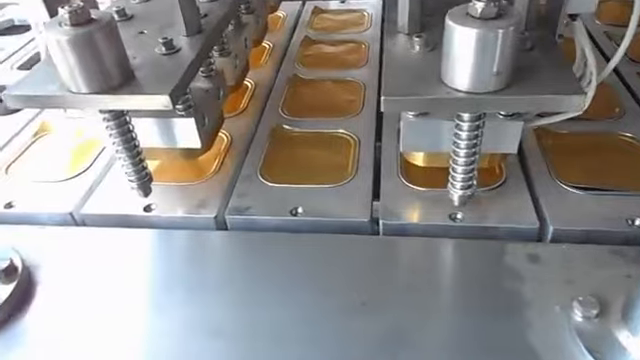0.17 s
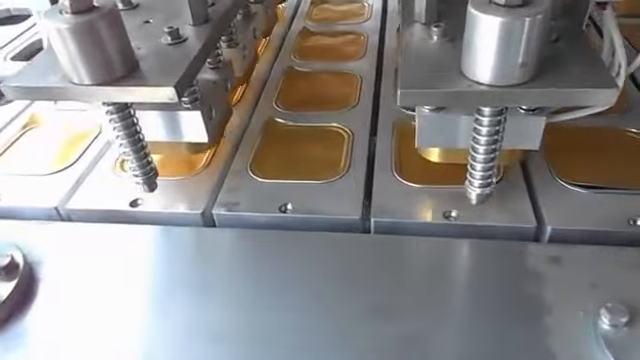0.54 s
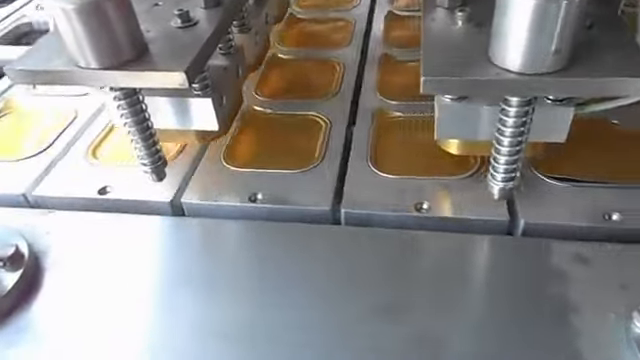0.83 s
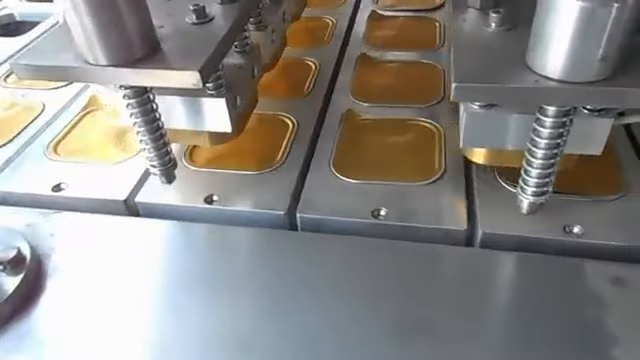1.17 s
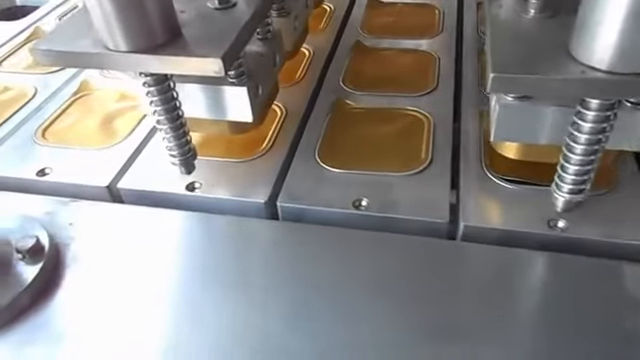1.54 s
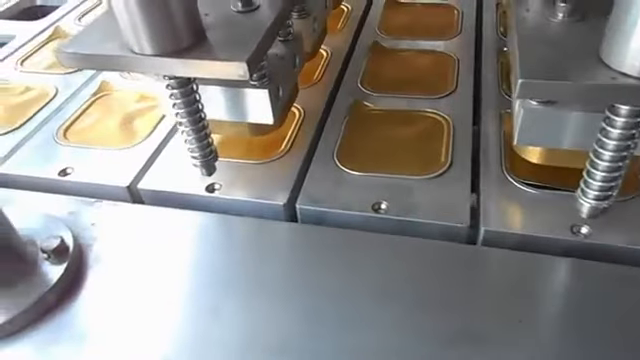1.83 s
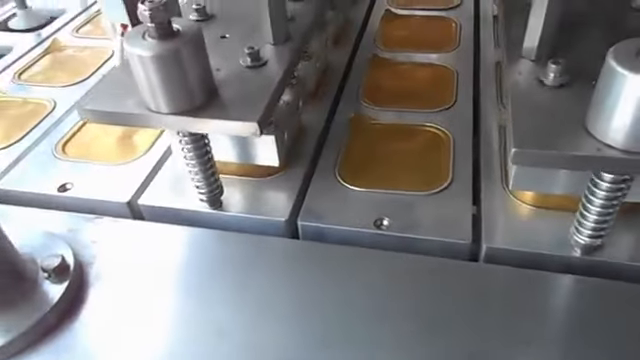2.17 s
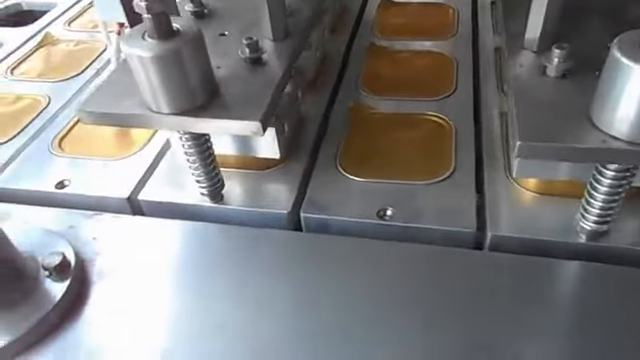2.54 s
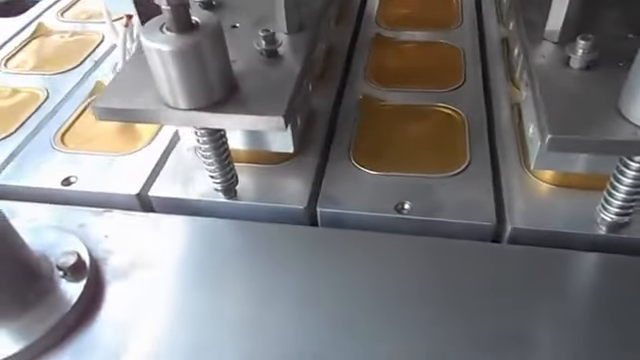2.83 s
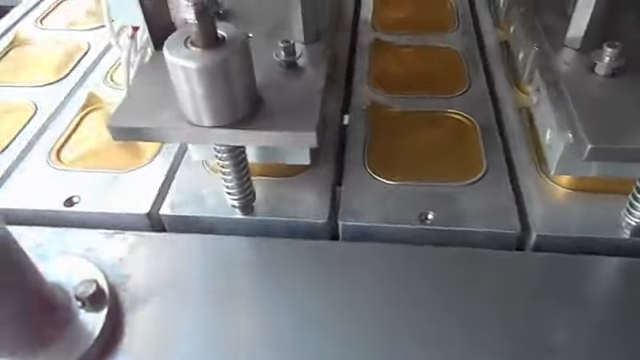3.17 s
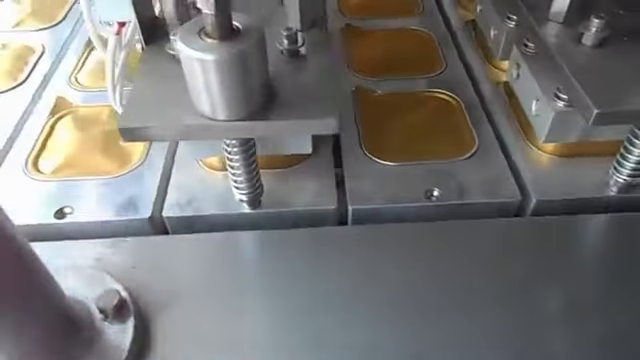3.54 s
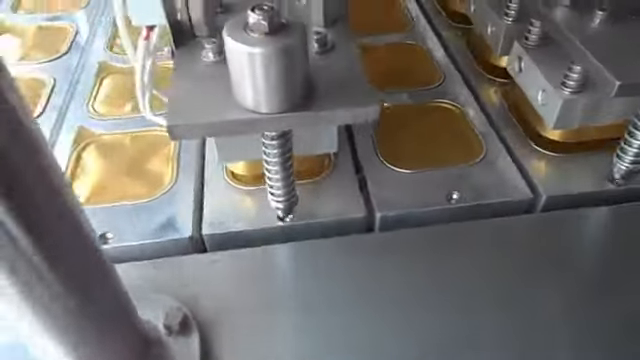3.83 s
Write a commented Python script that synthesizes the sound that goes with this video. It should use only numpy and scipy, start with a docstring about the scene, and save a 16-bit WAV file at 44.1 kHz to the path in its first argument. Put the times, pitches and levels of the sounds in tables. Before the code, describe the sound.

A pneumatic sealing machine works close by, over a low motor hum and rumble. Its conveyor scrapes along with a swell of air and clacks against a steel stop at 1.1 seconds. Around 1.8 seconds a valve snaps, air blasts out loudly and the sealing heads clunk down. From 2 to 4 seconds a bright hiss continues, with thin whistles, small knocks and a short spit of air at 3.5.

```python
"""A factory hall, close to a pneumatic lid-sealing machine. Over a motor hum, the tray conveyor
scrapes one step along with a swell of air and clacks against its steel stop. A valve snaps, air
blasts from the exhaust and the sealing heads clunk down. Air then hisses on steadily, whistling
at the seals, over small knocks of the frame. All of it is on the left channel, through a limiter."""
import sys
import numpy as np
from scipy import signal
from scipy.fft import rfft, irfft, next_fast_len
from scipy.io import wavfile
from scipy.ndimage import uniform_filter1d, minimum_filter1d, map_coordinates

SR = 44100
rng = np.random.default_rng(int(sys.argv[2]) if len(sys.argv) > 2 else 0)


def log_audio(samples):
    """Write samples as a 16-bit WAV file to the path given in sys.argv[1]."""
    # one column per channel
    frames = np.atleast_2d(samples).T
    # limit to full scale, then quantise
    limited = np.clip(frames, -1, 1)
    pcm = np.round(limited * 32767).astype(np.int16)
    wavfile.write(sys.argv[1], SR, pcm)


N = 176400
TIME = np.arange(N) / SR


def amp(db):
    """Decibels to gain."""
    return 10 ** (np.asarray(db) / 20)


def unit(x):
    """Scale to rms 1."""
    return x / np.sqrt(np.mean(x ** 2) + 1e-20)


def along(points, hz):
    """Read a curve of (f/Hz, value) points on a log frequency axis."""
    f, value = np.transpose(points)
    return np.interp(np.log(hz + 1), np.log(f + 1), value)


def fader(rows):
    """Gain per sample from (t/s, level/dB) rows."""
    return amp(np.interp(TIME, *np.transpose(rows)))


def wobble(rate):
    """A smooth random curve, rate knots a second."""
    return map_coordinates(rng.standard_normal(2000), [TIME * rate], mode="mirror")


def burst(start, attack, t60, hold=0):
    """Envelope that rises, holds, then falls 60 dB in t60 seconds."""
    t = TIME - start
    return np.clip(t / attack, 0, 1) * amp(-60 * np.maximum(t - attack - hold, 0) / t60)


def filtered(x, response):
    """EQ x with a gain given as a function of frequency."""
    size = next_fast_len(N + SR // 2)
    return irfft(rfft(x, size) * response(np.fft.rfftfreq(size, 1 / SR)), size)[:N]


def rush(tone, peaks=(), ripple_db=0):
    """Noise of rms 1 shaped by an EQ, narrow resonances and the fine ripple of nearby steel walls."""
    knots = rng.standard_normal(1000)
    def colour(f):
        resonance = sum(amp(db) ** 2 * 2 / (1 + (2 * (f - hz) / width) ** 2) for hz, width, db in peaks)
        ripple = np.interp(f, np.linspace(0, SR / 2, len(knots)), knots)
        return amp(along(tone, f) + ripple_db * ripple) * np.sqrt(1 + resonance)
    return unit(filtered(rng.standard_normal(N), colour))


def reflections(x, depth_db, spacing_hz=45, drift_s=.3):
    """Steel reflections ripple the spectrum, shifting as the microphone moves; returns rms 1."""
    hz, t, spectrum = signal.stft(x, SR, nperseg=4096)
    grid = np.meshgrid(hz / spacing_hz, t / drift_s, indexing="ij")
    ripple = map_coordinates(rng.standard_normal((600, 20)), grid, mode="mirror")
    return unit(signal.istft(spectrum * amp(depth_db * ripple), SR, nperseg=4096)[1][:N])


# Reverb decay of the hall: f/Hz, t60/s
HALL_DECAY = [(200, 1), (2000, 0.11), (10000, 0.14)]
def hall(x):
    """The factory hall's tail: the lows linger, the highs die quickly."""
    hz, t, spectrum = signal.stft(rng.standard_normal(SR // 2), SR, nperseg=256)
    decay = amp(-60 * t / along(HALL_DECAY, hz)[:, None])
    tail = signal.istft(spectrum * decay, SR, nperseg=256)[1]
    return signal.fftconvolve(x, tail / np.linalg.norm(tail))[:N]


# Background and handling rumble: t/s, level/dB
RUMBLE_FADER = [(0, -47.5), (1.5, -46), (3.0, -49.5), (3.8, -43.5)]
# Rumble EQ, all low end: f/Hz, level/dB
RUMBLE_EQ = [(20, -6.5), (80, -5), (130, -3), (170, -8), (210, -8.5), (270, -9), (330, -19), (700, -35),
             (1500, -69)]
def low_rumble():
    """Low background rumble, with microphone handling rumble swelling near the end."""
    return fader(RUMBLE_FADER) * rush(RUMBLE_EQ)


def hum_line(hz):
    """One motor partial of rms about 1 that flutters in level and phase."""
    flutter = amp(2.0 * wobble(20))
    return np.sqrt(2) * flutter * np.sin(2 * np.pi * hz * TIME + .5 * wobble(14))


# Motor partials: f/Hz, level while feeding/dB, level while pressing/dB
MOTOR_PARTIALS = [(222, -47, -59.5), (271.2, -42.5, -57), (457, -52, -65), (590, -43.5, -69),
                  (774, -52, -67), (859, -48.5, -66)]
# Low drone, dipping early and creeping back: t/s, level/dB
DRONE_FADER = [(.35, -41), (.6, -57), (1.25, -50.5), (1.6, -46.5), (3.7, -48)]
def motor(run_up_s=0.53, feed_end_s=1.57, run_down_s=0.72):
    """The hum swells with the conveyor's load, over a low drone."""
    load = np.clip(TIME / run_up_s, 0, 1) * np.clip(1 - (TIME - feed_end_s) / run_down_s, 0, 1)
    hum = sum(amp(pressing + (feeding - pressing) * load) * hum_line(hz)
              for hz, feeding, pressing in MOTOR_PARTIALS)
    return hum + fader(DRONE_FADER) * hum_line(hz=172.5)


# One conveyor step: t/s, level/dB
SCRAPE_FADER = [(0, -40.5), (.25, -33), (.85, -32), (1.05, -32.5), (1.3, -33.5), (1.5, -34.5), (1.9, -32),
                (2.1, -43), (2.35, -48.5), (3.0, -50.5), (3.45, -47), (3.62, -47), (3.8, -54), (4, -46.5)]
# Scrape EQ, full in the low mids: f/Hz, level/dB
SCRAPE_EQ = [(70, -36), (140, -7), (270, -9), (400, -9.5), (700, -7.5), (1100, -11), (2100, -19),
             (3100, -22.5), (5000, -24), (8000, -66)]
def conveyor():
    """The tray plates slide along with a grainy scrape."""
    grain = amp(-1.5 + 0.2 * wobble(45))
    return fader(SCRAPE_FADER) * grain * reflections(rush(SCRAPE_EQ), depth_db=2.2)


# Swell of air from the feed cylinder: t/s, level/dB
VENT_FADER = [(0, -45), (.3, -34), (.5, -32.5), (.6, -30), (.9, -27), (1.05, -30), (1.2, -36.5),
              (1.35, -41), (1.48, -45), (1.62, -46), (1.66, -42), (1.75, -43), (1.9, -75)]
# Vent EQ, broad and airy: f/Hz, level/dB
VENT_EQ = [(600, -10.5), (1100, -3), (2100, -4), (3300, -7.5), (4400, -4.5), (5300, -7.5), (6050, -4),
           (7100, -5.5), (8500, -0.5), (9500, -5), (10300, -7), (11000, -18.5), (12000, -25), (12700, -64)]
# Whistles of the part-open vent: f/Hz, width/Hz, level over the rush/dB
VENT_WHISTLES = [(5900, 220, 5.5), (6350, 150, 5), (8550, 490, 3)]
def feed_cylinder(fully_open_s=0.88):
    """The cylinder vents: a whistle crossfades to a plain rush as the vent opens."""
    opening = np.clip(TIME / fully_open_s, 0, 1)
    vent = np.sqrt(1 - opening) * rush(VENT_EQ, VENT_WHISTLES) + np.sqrt(opening) * rush(VENT_EQ)
    flutter = amp(0.72 * wobble(69.5))
    return fader(VENT_FADER) * flutter * reflections(vent, depth_db=3.0)


def clack(start, tone, modes, attack, t60, ring_db):
    """Steel hits steel: a dense crash with a few ringing modes."""
    ring = sum(amp(db) * burst(start, attack, decay) * np.sin(2 * np.pi * hz * TIME + .82 * wobble(150))
               for hz, db, decay in modes)
    crash = burst(start, attack, t60) * rush(tone, ripple_db=1.0)
    return crash + amp(ring_db) * ring


# Hard crash of the stop: f/Hz, level/dB
STOP_EQ = [(300, -44), (760, 1), (1800, -11.5), (2510, 0), (3460, -9), (5500, -6.5), (10100, -3.5),
           (11100, -26), (15500, -48)]
# Ring of the stop: f/Hz, level/dB, t60/s
STOP_RING = [(756, -9, 0.24), (2090, -9, 0.097), (2511, 6.5, 0.053), (4000, -9, 0.12), (5480, -5, 0.11),
             (6000, -14, 0.071)]
def end_stop():
    """The conveyor runs into its steel stop with a short, loud clack."""
    return amp(-7) * clack(1.1035, STOP_EQ, STOP_RING, attack=.0045, t60=0.044, ring_db=-10.5)


# Bright snap of the valve: f/Hz, level/dB
VALVE_EQ = [(500, -35), (1040, -3), (2000, -2.5), (3090, -3), (4700, -2), (8540, -0.5), (12500, -38),
            (15000, -68)]
# Ring of the valve: f/Hz, level/dB, t60/s
VALVE_RING = [(1087, -2.5, 0.076), (1110, -15, 0.063), (3190, -8, 0.089)]
def valve():
    """The steel valve snaps just ahead of the air blast."""
    return amp(-18.5) * clack(1.7515, VALVE_EQ, VALVE_RING, attack=.0008, t60=0.17, ring_db=3)


def ping(start, hz, db, t60):
    """One struck mode with a sharp attack and a slightly unsteady phase."""
    return amp(db) * burst(start, .0008, t60) * np.sin(2 * np.pi * hz * TIME + .5 * wobble(22.8))


# Knock cues: t/s, frame level/dB, thud level/dB, rattle level/dB, t60/s
KNOCK_CUES = [(0.939, -38, -52, -24.5, 0.26), (1.708, -56, -66, -36.5, 0.088),
              (1.797, -30.5, -59, -27, 0.15), (1.83, -27.5, -34.5, -20.5, 0.29),
              (1.912, -29, -45, -17, 0.11), (1.919, -20, -33.5, -24, 0.16), (1.975, -38, -38, -42, 0.21),
              (2.025, -51, -44, -46, 0.33), (2.143, -48, -45, -36, 0.11), (2.209, -34.5, -39.5, -39, 0.2),
              (2.392, -48, -56, -30.5, 0.15), (2.433, -41.5, -44, -29, 0.33),
              (2.704, -40.5, -39.5, -51, 0.22), (3.508, -33, -39.5, -41, 0.29),
              (3.557, -36.5, -52, -31, 0.59)]
# Mid layer, the frame's clunk: f/Hz, level/dB
FRAME_EQ = [(100, -19), (300, 1), (640, 4.5), (900, 8.5), (1300, -22.5), (1800, -7.5), (3000, 4),
            (6000, -58)]
# Body resonances of the frame: f/Hz, width/Hz, level/dB
FRAME_RESONANCES = [(547, 60, 2), (970, 57, 1), (1110, 66, 13), (1655, 44, 19)]
# Low layer, the machine bed's thud: f/Hz, level/dB
THUD_EQ = [(25, -4), (65, -30), (100, 3.5), (135, 1), (220, -11), (400, -7), (900, -63)]
# Top layer, the rattle of loose parts: f/Hz, level/dB
RATTLE_EQ = [(700, -3), (1700, 4.5), (2400, 1.5), (5000, 2), (10000, 1), (11000, -27), (13000, -54)]
def head_knocks(attack=0.0057, thud_stretch=1.75):
    """Each knock rings the frame in its own way, thuds through the bed and rattles loose parts."""
    bed, out = rush(THUD_EQ), np.zeros(N)
    for start, frame_db, thud_db, rattle_db, t60 in KNOCK_CUES:
        frame = amp(frame_db) * rush(FRAME_EQ, FRAME_RESONANCES, ripple_db=3.5)
        rattle = amp(rattle_db) * rush(RATTLE_EQ, ripple_db=3.5)
        out += burst(start, attack, t60) * (frame + rattle)
        out += burst(start, attack, t60 * thud_stretch) * amp(thud_db) * bed
    return out


# Whistle cues at the seals: t/s, length/s, f/Hz, level/dB
LEAK_CUES = [(2.15, .62, 4790, -39.5), (2.66, .13, 4850, -37), (2.05, .8, 5320, -40.5),
             (2.1, .7, 4110, -44), (3.42, .17, 4880, -36), (3.55, .45, 4470, -41.5)]
def seal_leaks(width_hz=55, waver_hz=18, fade_s=.06):
    """Thin, breathy whistles come and go at the seals, wavering in pitch."""
    out = np.zeros(N)
    for start, length, hz, db in LEAK_CUES:
        swell = np.clip(np.minimum(TIME - start, start + length - TIME) / fade_s + .5, 0, 1)
        phase = 2 * np.pi * np.cumsum(hz + waver_hz * wobble(10)) / SR
        whistle = unit(wobble(width_hz) * np.sin(phase) + wobble(width_hz) * np.cos(phase))
        out += amp(db) * swell * whistle
    return out


# Spit EQ, a narrow band of sizzle: f/Hz, level/dB
SPIT_EQ = [(5800, -21.5), (7000, -3), (8200, 9.5), (9900, -1), (11000, -34), (15500, -56)]
def air_spit():
    """One short spit of air near the end."""
    return amp(-13.5) * burst(start=3.512, attack=.012, t60=0.18) * rush(SPIT_EQ, ripple_db=4.5)


# Blast cues: t/s, level/dB, attack/s, hold/s, release t60/s
BLAST_CUES = [(1.789, -17.5, 0.0097, 0.088, 0.081), (1.819, -12.5, 0.01, 0.04, 0.12)]
# Blast EQ, hard and bright: f/Hz, level/dB
BLAST_EQ = [(600, -31), (1000, -14.5), (3300, -10.5), (4440, -6.5), (7100, -1.5), (7530, 2.5), (10200, 1.5),
            (11200, -11.5), (13000, -28), (15500, -31)]
# Resonances of the exhaust port: f/Hz, width/Hz, level over the rush/dB
PORT_WHISTLES = [(4460, 170, -0.5), (7400, 150, 1), (9900, 480, -1)]
def exhaust():
    """Two overlapping blasts of air leave the port as the heads come down."""
    blasts = sum(amp(db) * burst(start, attack, t60, hold) for start, db, attack, hold, t60 in BLAST_CUES)
    return blasts * rush(BLAST_EQ, PORT_WHISTLES, ripple_db=-1.5)


# Hiss fader, a spike and then a long sustain: t/s, level/dB
HISS_FADER = [(1.8, -68), (1.9, -11.5), (1.98, -21), (2.6, -22), (2.8, -20.5), (3.12, -22), (3.48, -20),
              (3.58, -22), (3.75, -24.5), (4, -23)]
# Hiss EQ, mostly top end: f/Hz, level/dB
HISS_EQ = [(900, -55), (1400, -27.5), (2200, -21.5), (2860, -17), (3340, -12.5), (4200, -10), (6230, -8.5),
           (7900, -1.5), (10100, -2.5), (10600, -8.5), (11000, -26.5), (11600, -15.5), (12300, -39),
           (12700, -74)]
# Resonances of the air paths: f/Hz, width/Hz, level over the rush/dB
HISS_WHISTLES = [(2224, 33, 2.5), (7462, 27, 5), (7760, 50, 0), (7920, 36, -2), (8350, 63, 0),
                 (9220, 29, 4.5), (9440, 42, -0.5), (9760, 45, -1)]
def press_hiss():
    """Air hisses and whistles through its paths while the heads press."""
    flutter = amp(0.89 * wobble(40))
    hiss = fader(HISS_FADER) * flutter * rush(HISS_EQ, HISS_WHISTLES)
    return np.std(hiss) * reflections(hiss, depth_db=3.3)


def scene():
    """Mix the machine hard left; only the clacks and knocks feed the hall reverb."""
    hits = end_stop() + valve() + head_knocks()
    reverb = amp(-15) * hall(hits)
    air = press_hiss() + air_spit() + seal_leaks() + exhaust()
    feed = conveyor() + feed_cylinder()
    background = low_rumble() + motor()
    bed_boom = ping(start=1.92, hz=108, db=-36, t60=.9)  # the bed rings after the heads land
    spring_tick = ping(start=2.1425, hz=3100, db=-24, t60=.03)  # a spring ticks under the load
    machine = background + feed + hits + reverb + bed_boom + spring_tick + air
    return np.array([2 * machine, np.zeros(N)])


def record(dry, ceiling=.92, top_hz=15900):
    """A fast limiter and a brick-wall low-pass on the left; the right stays silent."""
    left, right = dry
    needed_gain = np.minimum(1, ceiling / (np.abs(left) + 1e-9))
    gain = uniform_filter1d(minimum_filter1d(needed_gain, size=45), size=45)  # about 1 ms
    return np.array([filtered(left * gain, lambda hz: hz < top_hz), right])


dry = scene()
out = record(dry)
log_audio(out)
```